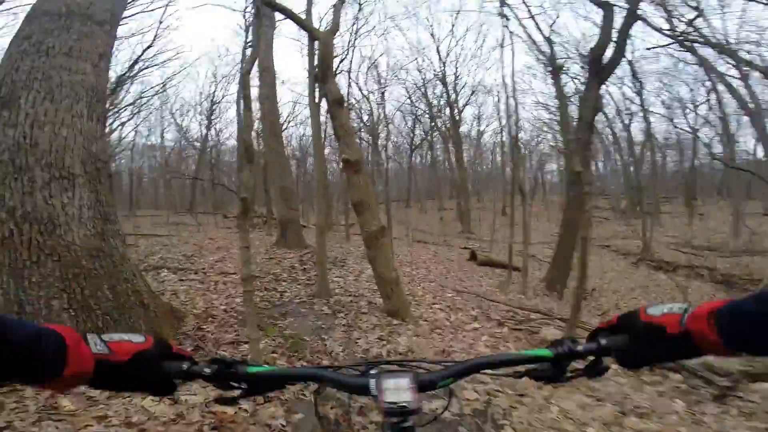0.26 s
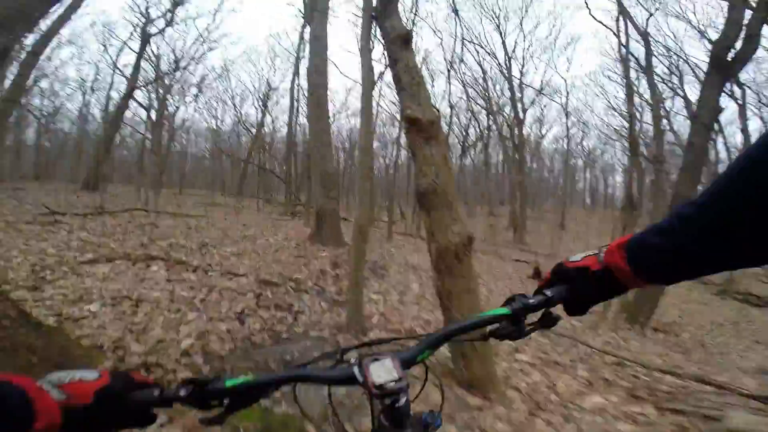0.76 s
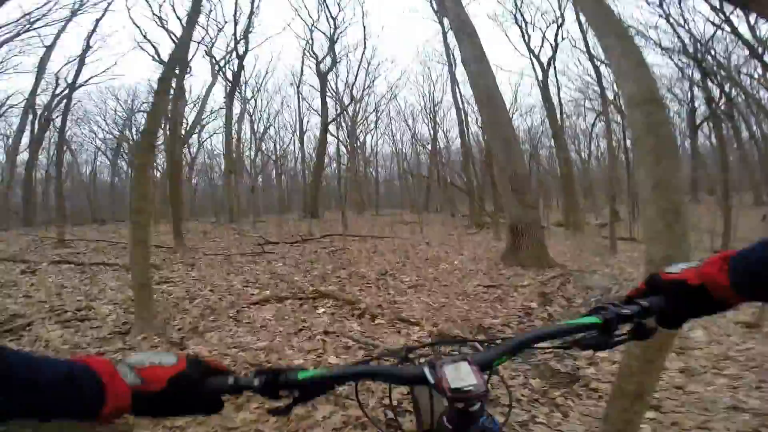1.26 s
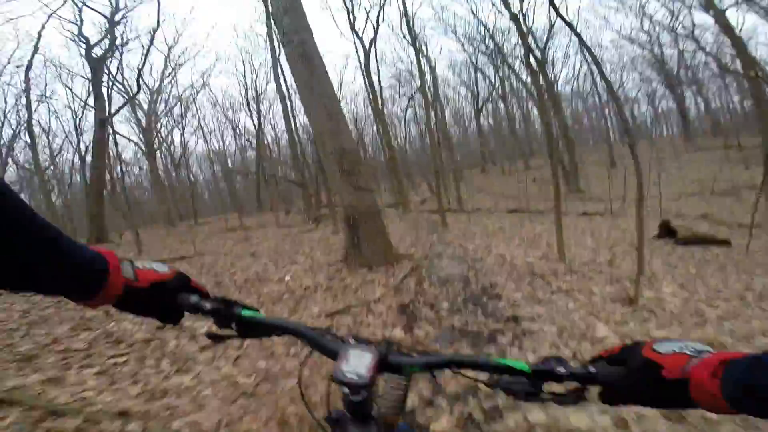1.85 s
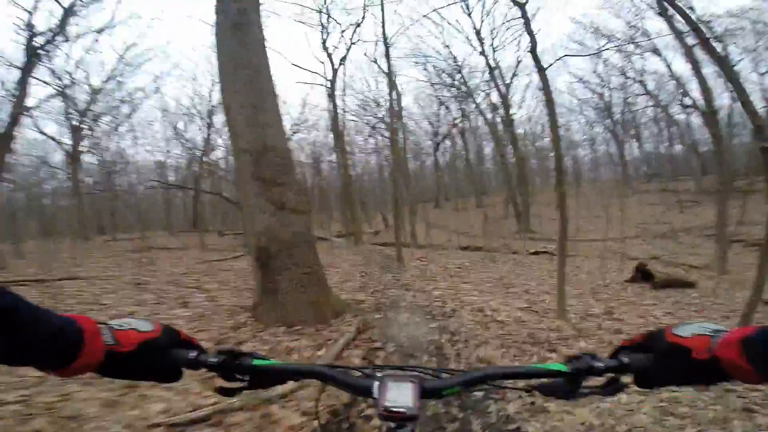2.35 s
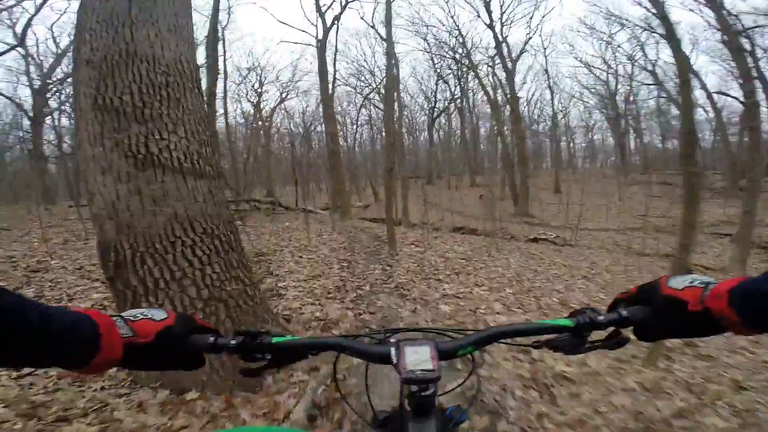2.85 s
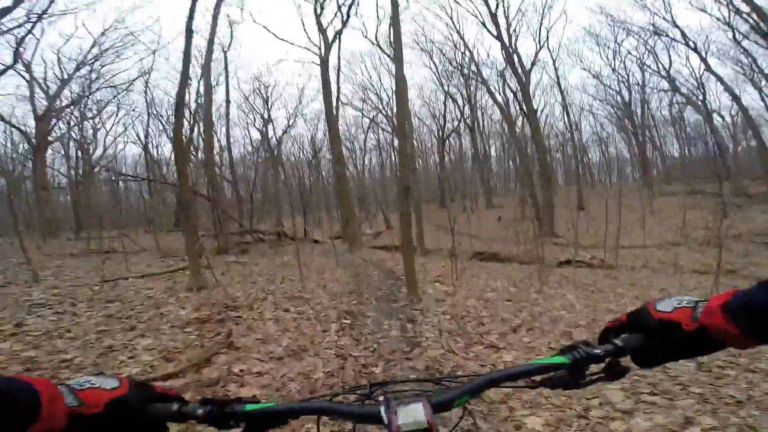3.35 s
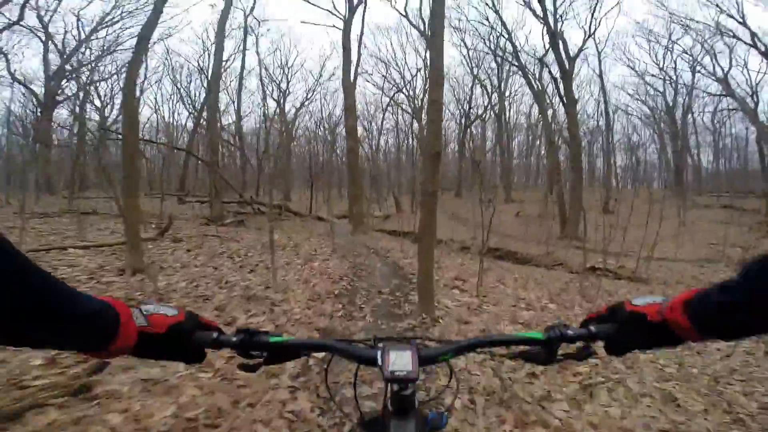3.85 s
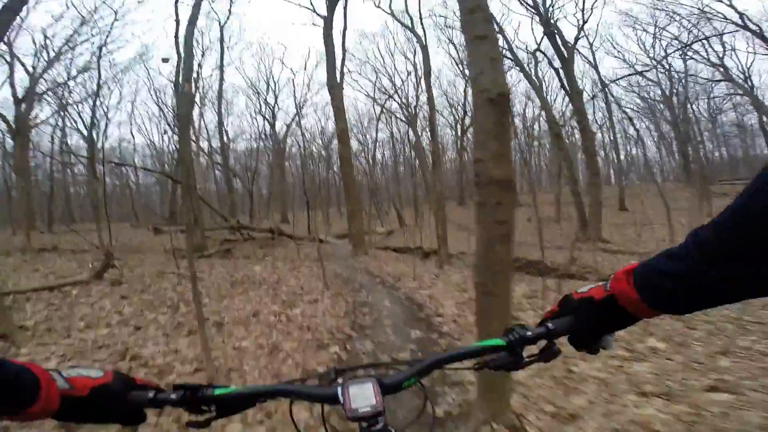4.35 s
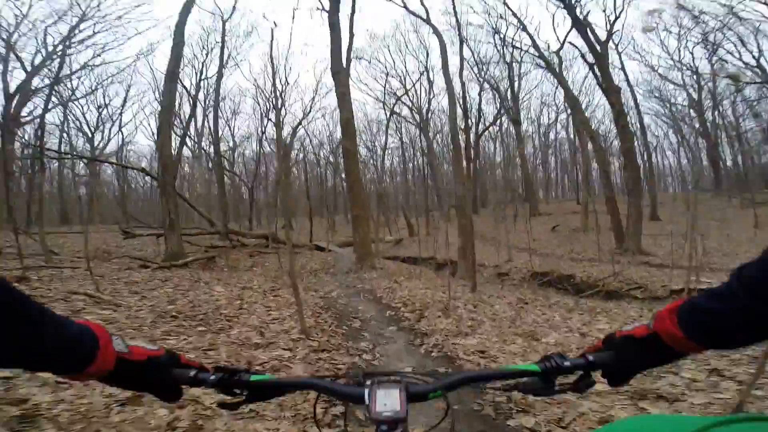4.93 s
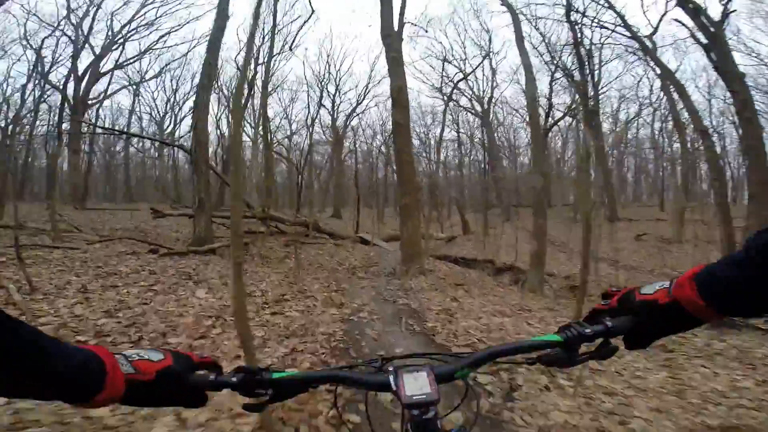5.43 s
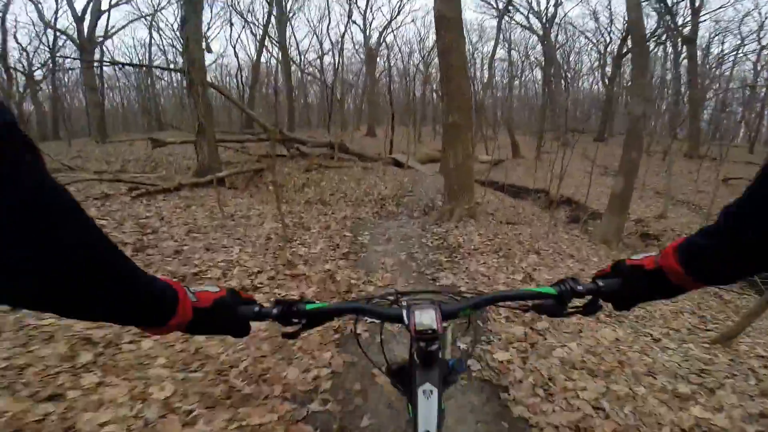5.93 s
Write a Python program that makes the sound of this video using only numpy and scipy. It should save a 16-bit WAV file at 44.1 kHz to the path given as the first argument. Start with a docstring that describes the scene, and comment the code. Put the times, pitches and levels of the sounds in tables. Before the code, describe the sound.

Bicycle tyres roll over dirt and dry leaves outdoors, very close and boxy, without noticeable echo. Low bumps and swaying rumble shake the mount, and hollow plastic ticks cluster early and mid-ride. The leaf crunch peaks in the middle, then calms to sparse crackles, faint hiss, soft thuds, one hard click near five seconds and a few small cloth brushes.

```python
"""A soft thump opens the scene over a low lumpy rumble and crackling leaves: a rider pedals a mountain bike
along a leafy woodland trail, heard by a microphone in a plastic housing. Thumps are short swings of pressure;
rumble, hiss and cloth swishes are shaped noise. Leaf snaps are noise bursts that ring the housing, while tyre
roll rings the mount and frame. Ticks and woody knocks are single blows on these same two bodies."""
import sys
import numpy as np
from scipy import signal
from scipy.fft import rfft, irfft
from scipy.io import wavfile
from scipy.ndimage import uniform_filter1d

SR = 44100
rng = np.random.default_rng(int(sys.argv[2]) if len(sys.argv) > 2 else 0)


def unload_wav(signal):
    """Save mono or channel-first audio to the path in sys.argv[1] as 16-bit WAV at rate SR, clipped to [-1, 1]."""
    wavfile.write(
        sys.argv[1],
        SR,
        np.round(np.clip(np.atleast_2d(signal).T, -1, 1) * 32767).astype(np.int16),
    )


N = 273420  # length in samples

# jolts through the mount, most of them one per pedal stroke; the crest comes 21.75 ms after start_s:
# start_s, level_db (main swing), pitch_hz, length_cycles
THUMPS = [(-0.019, -18.5, 39, 2), (0.319, -22.5, 36.2, 2.1), (0.496, -41, 31.8, 3), (0.626, -24, 35.4, 1.5),
          (0.79, -35, 32, 1.9), (0.973, -24.5, 33.7, 0.86), (1.305, -23.5, 50, 1.6),
          (1.347, -24.5, 55.4, 1.1), (1.435, -25, 60, 1.1), (1.51, -29, 32.3, 2), (1.615, -26.5, 60.5, 2.8),
          (1.955, -19, 63.6, 1.8), (2.287, -22, 46.4, 1.7), (2.406, -25, 32.5, 1.7),
          (2.613, -26.5, 78.1, 1.8), (2.941, -24.5, 59, 2.45), (3.247, -25.5, 54.7, 1.4),
          (3.272, -23, 48, 2.4), (3.352, -26.5, 35.8, 0.99), (3.596, -22, 47.8, 1.77),
          (3.918, -21.5, 46, 1.54), (4.263, -24, 60.7, 1.6), (4.408, -22.5, 50, 0.6),
          (4.596, -18.5, 37, 1.27), (4.647, -26, 112, 1.25), (4.927, -29.5, 34.7, 0.38),
          (4.967, -31, 53.3, 1.2), (5.24, -28, 78.1, 3), (5.414, -26, 74.5, 2.5), (5.51, -31.5, 92, 1.5),
          (5.578, -31, 77.5, 2.3), (5.899, -22, 45.4, 1.8)]
# shaking of the mount: time_s, sway_db (deep), rumble_db (quicker)
SHAKING_LEVELS = [(0.0, -33.5, -55), (0.14, -40.5, -46.5), (0.6, -37, -47), (1.2, -38, -43),
                  (1.6, -37.5, -45), (2.0, -35.5, -41.5), (2.45, -33.5, -50), (2.65, -34, -42.5),
                  (2.83, -39.5, -51.5), (3.0, -40.5, -48), (3.5, -38, -45), (4.0, -38.5, -46.5),
                  (4.45, -37, -46.5), (4.72, -48, -48.5), (5.0, -41.5, -45.5), (5.38, -37.5, -49),
                  (5.62, -36, -38), (5.84, -40, -49.5), (5.94, -40, -37.5), (6.03, -40, -57),
                  (6.2, -50, -52)]
# the rider's body heaves and the sway swells: peak_s, sway_db
BODY_HEAVES = [(0.28, -42), (0.65, -25), (0.85, -24.5), (1.09, -27), (1.17, -26), (1.26, -26), (1.5, -23),
               (1.67, -36), (1.95, -27.5), (2.19, -31), (2.35, -41), (2.47, -21.5), (3.64, -31), (4.3, -33),
               (4.51, -26.5), (4.61, -31.5), (4.94, -31), (5.29, -30.5), (5.42, -46), (5.77, -28),
               (6.13, -33.5)]
HEAVE_DB_PER_S = 266  # how fast a heave swells and fades
# tone colour of the deep sway: pitch_hz, level_db (relative, per Hz)
SWAY_COLOUR = [(4, 11.5), (14, 9), (26, 10.5), (45, -6.5), (80, -11.5)]
# tone colour of the quicker rumble: pitch_hz, level_db (relative, per Hz)
RUMBLE_COLOUR = [(25, -6), (50, -3), (100, -7), (170, -15), (280, -32.5), (600, -40.5)]

# steady bed of leaves under the tyres: time_s, crackle_db, roll_db (dull tyre roll)
LEAF_BED = [(0.0, -51.5, -53), (0.1, -62.5, -67), (0.4, -54.5, -55.5), (0.9, -52.5, -52), (1.1, -51, -52),
            (1.7, -53.5, -55.5), (1.92, -54.5, -56), (1.97, -44, -47.5), (2.25, -42.5, -45),
            (2.285, -54, -54), (2.33, -40.5, -46.5), (2.6, -39, -48.5), (2.86, -37, -40.5),
            (2.9, -43.5, -47), (3.0, -52.5, -52), (3.1, -42.5, -48.5), (3.43, -48.5, -54.5),
            (3.48, -54.5, -60.5), (3.72, -52.5, -57), (4.1, -58.5, -61.5), (4.36, -55, -55),
            (4.6, -62, -60.5), (5.14, -53, -56.5), (5.38, -66.5, -62), (5.65, -49.5, -52.5),
            (5.84, -61.5, -62.5), (6.2, -53.5, -55)]
# a tyre ploughs through a heap of leaves: loudest_s, crackle_db, length_s, roll_db (relative to crackle)
LEAF_CRUNCHES = [(0.192, -43.5, 0.073, -2), (0.337, -45, 0.19, -2), (0.515, -50, 0.068, -14),
                 (0.634, -40, 0.061, -2), (0.804, -46.5, 0.068, -10), (0.938, -46.5, 0.043, 6),
                 (1.022, -45, 0.26, 0), (1.159, -44.5, 0.065, 8), (1.272, -45.5, .09, -1),
                 (1.374, -49.5, 0.045, -1), (1.544, -41, 0.13, -4.5), (1.796, -39.5, 0.059, -3.5),
                 (1.972, -32.5, 0.036, -2), (2.037, -35.5, 0.042, -7), (2.112, -43.5, 0.061, -7),
                 (2.2, -35.5, 0.12, -8), (2.236, -33, 0.041, -6), (2.374, -31.5, 0.086, -8),
                 (2.435, -34, 0.054, -9), (2.507, -36, 0.046, -6), (2.552, -42, 0.02, -15),
                 (2.589, -34.5, 0.062, -23), (2.73, -57, .07, 6), (2.806, -39, 0.08, -10),
                 (2.848, -39, .05, -15), (3.046, -34.5, 0.047, -6), (3.12, -40.5, 0.064, -16),
                 (3.176, -43, .06, -10), (3.27, -58, 0.05, -11), (3.805, -44, 0.14, -1),
                 (4.04, -49.5, 0.16, -4.5), (4.207, -50, .07, -16), (4.355, -51.5, 0.14, -8),
                 (4.484, -56.5, 0.053, -3), (4.966, -43, .016, -22), (4.994, -52.5, .08, -17),
                 (5.132, -48, .06, -14), (5.441, -51, 0.11, -1)]
CRUNCH_RISE, CRUNCH_DROP_DB = 0.65, 15  # share of the length spent rising; drop at both ends
# leaf brightness as the trail surface changes: time_s, tilt_db_per_octave (at a crackle of -53.5 dB)
LEAF_BRIGHTNESS = [(0, 0.5), (.6, 1), (1.2, 0.5), (1.7, 4.5), (2.1, 2.5), (2.5, 3.5), (2.9, 2.5),
                   (3.25, 3.5), (3.6, 2), (4.2, 1.5), (5.1, 3.5), (5.45, 1), (6.2, 1.5)]
DULLING_DB = 0.25  # brightness per octave lost for each dB louder

# ways the housing rings: pitch_hz, width_hz (before extra damping), level_db (relative)
HOUSING_MODES = [(1310, 86, -10), (1720, 460, 6.5), (2350, 292, 3.5), (2674, 280, 5), (3499, 300, 3),
                 (4390, 610, -6.5), (5094, 283, -4.5), (6056, 970, -5), (7150, 1700, -15.5),
                 (8250, 1540, -16.5), (9780, 1200, -23.5), (11600, 1100, -29), (13040, 790, -29),
                 (14900, 780, -39)]
# low ways the mount and frame ring: pitch_hz, width_hz (before extra damping), level_db (relative)
FRAME_MODES = [(184, 164, 0), (310, 90, 1.5), (463, 117, -4), (613.5, 103, 0.5), (774, 320, -8),
               (1058, 58, -15.5), (988, 276, -10)]

# tone colour of the faint hiss: pitch_hz, level_db (relative, per Hz)
HISS_COLOUR = [(200, -25), (320, 3.5), (620, -5), (1050, -9), (1770, 2.5), (2100, -2.5), (2570, 4),
               (3060, -0.5), (3500, -4), (4700, -6), (6240, -13), (7600, -24.5), (10000, -20.5),
               (13000, -27), (14000, -26), (15300, -40)]
HISS_DB = -58  # middle level, before its small wavering

# ticks on the housing: start_s, peak_db, pitch_hz (strongest ring), treble_db (relative to peak)
HOUSING_TICKS = [(0.1044, -37.5, 3500, -19), (0.3337, -22, 1700, -49), (0.381, -41, 1820, -22),
                 (0.51, -36.5, 1790, -30), (0.536, -35, 2750, -23), (0.583, -31.5, 1710, -17),
                 (0.6263, -29, 1600, -19), (0.651, -29, 1670, -25), (0.7338, -31, 1710, -18),
                 (0.8039, -30, 2470, -22), (0.873, -35, 2630, -28), (0.921, -35, 1440, -30),
                 (0.972, -43, 1810, -7), (0.99, -31.5, 2560, -19), (1.049, -27.5, 1720, -18),
                 (1.151, -25.5, 2650, -21), (1.174, -35, 2090, -30), (1.1867, -30, 1650, -46),
                 (1.244, -37, 1790, -17), (1.7952, -31.5, 1720, -7), (1.8705, -35, 1760, -25),
                 (1.955, -27, 1960, -8), (2.025, -36, 2200, -17), (2.0867, -24.5, 2080, -28),
                 (2.1788, -28, 1720, -13), (2.2358, -20.5, 1630, -30), (2.2997, -33.5, 3480, -27),
                 (2.3275, -23.5, 1670, -25), (2.3375, -23.5, 1740, -23), (2.378, -26.5, 1900, -3),
                 (2.407, -27, 1700, -28), (2.4793, -21, 2260, -22), (2.547, -27, 2300, -16),
                 (2.5765, -23, 1780, -20), (2.6267, -24, 2420, -22), (2.634, -32, 2420, -6),
                 (2.659, -27, 2310, -25), (2.745, -25, 2250, -15), (2.805, -27, 1610, -17),
                 (2.815, -26.5, 2600, 2), (3.029, -33, 1630, 0), (3.0867, -30, 1840, -14),
                 (3.115, -32, 1800, -10), (3.177, -37, 2500, 0), (3.1971, -30, 3460, -23),
                 (3.3368, -29.5, 2560, -8.5), (3.3735, -29.5, 3480, -22), (3.406, -31, 2740, -14),
                 (3.914, -36.5, 2350, -34), (3.9686, -38.5, 1710, -3), (4.196, -29.5, 2290, -29),
                 (4.8889, -19, 2650, -16.5), (4.9595, -28, 2850, -9), (5.227, -34.5, 2560, -16),
                 (5.286, -37.5, 2420, -8), (5.2999, -36.5, 2660, -10), (5.5105, -31.5, 2580, -47),
                 (5.793, -29.5, 2200, -47), (5.8632, -30, 2350, -31), (5.965, -34, 2780, -20)]
NARROW_DB, NARROWING = -3, 0.75  # narrowness per octave, and its growth for each dB of treble lost
TAIL, TAIL_S = 0.13, 0.003  # rough tail of a tick: share of the blow, decay time in seconds

# woody knocks in mount and frame: start_s, peak_db, pitch_hz (strongest ring)
FRAME_KNOCKS = [(0.149, -39, 318), (0.33, -40, 207), (0.533, -39, 253), (0.616, -36.5, 587),
                (0.8025, -22, 430), (0.81, -32, 310), (0.904, -41, 891), (0.9205, -28.5, 850),
                (1.0478, -34, 680), (1.135, -40, 500), (1.149, -32, 700), (1.173, -36, 600),
                (1.186, -38, 500), (1.246, -32, 800), (1.275, -47, 283), (1.504, -33, 202),
                (1.524, -29.5, 196), (1.795, -34, 450), (1.83, -45, 305), (1.953, -31, 234),
                (2.028, -39, 283), (2.087, -39, 272), (2.126, -30, 398), (2.407, -34, 603),
                (2.459, -37, 331), (2.857, -35, 455), (3.032, -36, 670), (3.337, -33, 452),
                (3.371, -38, 226), (3.42, -32, 533), (3.739, -42, 409), (4.194, -37.5, 352),
                (4.425, -37, 202), (4.664, -37.5, 202), (4.886, -36, 403), (5.435, -48, 202)]
KNOCK_NARROW_DB = 8.5  # loss per octave away from the strongest ring

# smooth swishes, likely cloth brushing the housing: start_s, length_s, level_db
CLOTH_SWISHES = [(3.757, 0.071, -43.5), (4.439, 0.057, -48.5), (5.54, 0.18, -47)]
# tone colour of the swishes: pitch_hz, level_db (relative, per Hz)
SWISH_COLOUR = [(530, -53), (900, -65), (1410, -6), (1660, -15.5), (2550, 0), (3360, -4.5), (4260, -3.5),
                (4780, -13.5), (5220, -3.5), (7430, -39), (9660, -56), (16300, -120)]

EDGE_HZ = 15250  # top of the recorder's band


def gain_of(db):
    """Turns decibels into a gain."""
    return 10 ** (np.asarray(db) / 20)


def evened(x):
    """Scales a sound to an average strength (rms) of 1."""
    return x / np.sqrt(np.mean(x ** 2) + 1e-20)


def add(mix, s, sound):
    """Mixes a sound in at time s; what falls before the start is lost."""
    at = round(s * SR)
    sound = sound[max(-at, 0):]
    part = mix[max(at, 0):][:len(sound)]
    part += sound[:len(part)]


def curves(rows):
    """Draws straight lines through each table column, giving one value per sample."""
    s, *columns = np.transpose(rows)
    t = np.arange(N) / SR
    return [np.interp(t, s, column) for column in columns]


def noise(points):
    """Colours random noise with a table of levels over pitch, at rms 1."""
    hz = np.fft.rfftfreq(N, 1 / SR)
    f, db = np.transpose(points)
    colour_db = np.interp(np.log(hz + 1), np.log(f + 1), db, left=-90, right=-90)
    return evened(irfft(rfft(rng.standard_normal(N)) * gain_of(colour_db), N))


def lumps(seconds):
    """Smooths chance over the given time into a slow wavering, rms 1."""
    size = max(round(seconds * SR), 1)
    smoother = uniform_filter1d(rng.standard_normal(N), size)
    return evened(uniform_filter1d(smoother, size))


def swells(bed_db, s, db, rise_db_per_s, fall_db_per_s):
    """Puts swells that peak at times s on top of a level in dB; powers add."""
    grid = np.arange(0, N, 64)  # every 64 samples is fine enough
    late = grid[:, None] / SR - s
    peaks_db = db - np.where(late < 0, -late * rise_db_per_s, late * fall_db_per_s)
    power = np.interp(np.arange(N), grid, np.sum(gain_of(peaks_db) ** 2, axis=1))
    return 10 * np.log10(gain_of(bed_db) ** 2 + power)


def ring(modes, extra_db=0, damping=1):
    """Each mode answers a click by swelling, then dying; neighbours swing opposite ways."""
    hz, width, db = np.transpose(modes)[:, :, None]
    t = np.arange(1536) / SR
    sign = (-1.) ** np.arange(len(hz))[:, None]
    fall = 1.55 * damping * np.pi * width
    envelope = fall ** 2 * t * np.exp(-fall * t)
    return sign * gain_of(db + extra_db) * envelope * np.sin(2 * np.pi * hz * t)


def rubbed(modes, loudness, own_db, tilt_db=0, pivot_hz=2500):
    """Rough bursts ring a body; each mode's share wavers by chance, so no snap reaches all alike."""
    rough, out = loudness * rng.standard_normal(N), np.zeros(N)
    answers = ring(modes)
    for (hz, _, _), answer in zip(modes, answers):
        reach_db = own_db * lumps(0.016) + tilt_db * np.log2(hz / pivot_hz)
        out += signal.oaconvolve(rough * gain_of(reach_db), answer)[:N]
    return out / np.sqrt(np.mean(rough ** 2) * np.sum(answers.sum(0) ** 2))


def struck(modes, blow, extra_db, damping):
    """One blow rings all modes of a body together, scaled to peak 1."""
    sound = np.convolve(blow, ring(modes, extra_db, damping).sum(0))
    return sound / abs(sound).max()


def thumps():
    """A jolt presses the microphone port: a swing or two with a sharper crest in the middle."""
    out = np.zeros(N)
    for s, db, hz, cycles in THUMPS:
        turns = np.arange(-1.5, 2.5, hz / SR / cycles) * cycles  # 0 at the crest
        slower_fall = np.where(turns > 0, 2.1, 1)
        swing = np.cos(2 * np.pi * turns) * np.exp(-(3.27 * turns / cycles) ** 2 / slower_fall)
        crest = np.cos(2 * np.pi * 2.46 * turns) * np.exp(-(1.7 * turns) ** 2)
        add(out, s + 0.02175 + turns[0] / hz, gain_of(db) * (swing + 0.16 * crest))
    return out


def shaking():
    """The mount sways and rumbles in lumps as the wheels meet small bumps."""
    sway_db, rumble_db = curves(SHAKING_LEVELS)
    sway_db = swells(sway_db, *np.transpose(BODY_HEAVES), HEAVE_DB_PER_S, HEAVE_DB_PER_S)
    sway = gain_of(sway_db) * noise(SWAY_COLOUR)
    rumble = gain_of(rumble_db + 5.38 * lumps(0.026)) * noise(RUMBLE_COLOUR)
    return sway + rumble


def crackle(per_s, spread_db, clump_db, snap_s, hush):
    """Loudness of clumped snaps of very unequal size, each dying fast, over a finer hush."""
    chance = per_s / SR * gain_of(clump_db * lumps(0.023))
    size = gain_of(spread_db * np.minimum(rng.exponential(1, N), 3.5))
    hits = size * (rng.random(N) < chance)
    decay = np.exp(-1 / (snap_s * SR))
    return evened(signal.lfilter([1], [1, -decay], hits)) + hush


def leaves():
    """Snapping leaves ring the housing; the tread rolling on dirt rings the frame."""
    bed_db, bed_roll_db = curves(LEAF_BED)
    s, db, length, roll_rel_db = np.transpose(LEAF_CRUNCHES)
    rise = CRUNCH_DROP_DB / (CRUNCH_RISE * length)
    fall = CRUNCH_DROP_DB / ((1 - CRUNCH_RISE) * length)
    level_db = swells(bed_db, s, db, rise, fall)
    roll_db = swells(bed_roll_db, s, db + roll_rel_db, rise, fall)

    tilt_db = curves(LEAF_BRIGHTNESS)[0] - DULLING_DB * (level_db + 53.5)
    harder_db = 0.13 * (roll_db + 48.5)  # a harder roll favours the higher frame modes
    snaps = crackle(per_s=420, spread_db=3.5, clump_db=2.5, snap_s=0.0034, hush=1.0)
    grit = 0.22 * snaps + crackle(per_s=190, spread_db=2.0, clump_db=2.5, snap_s=0.0081, hush=0.43)
    crackling = gain_of(level_db) * rubbed(HOUSING_MODES, snaps, 1.5, tilt_db)
    rolling = gain_of(roll_db) * rubbed(FRAME_MODES, grit, 1.36, harder_db, pivot_hz=620)
    return crackling + rolling


def hiss():
    """Faint rustle and microphone noise: coloured noise with a slightly wavering level."""
    return gain_of(HISS_DB + 1.5 * lumps(0.01)) * noise(HISS_COLOUR)


def ticks():
    """A sharp blow with a faint rough tail rings the housing most near the tick's own pitch."""
    out, t = np.zeros(N), np.arange(400) / SR
    modes_hz = np.array(HOUSING_MODES)[:, :1]
    roughs = rng.standard_normal((len(HOUSING_TICKS), 400))
    for (s, db, hz, treble_db), rough in zip(HOUSING_TICKS, roughs):
        narrow_db = NARROW_DB - NARROWING * treble_db  # dull ticks favour their pitch most
        near_db = -abs(narrow_db * np.log2(modes_hz / hz))
        # modes from 4 kHz up follow the treble column, lifted over their low standing in the table
        extra_db = np.where(modes_hz < 4000, near_db, treble_db + 11.5)
        blow = (t == 0) + TAIL * rough * np.exp(-t / TAIL_S)
        # damping below 1: a clean blow shows sharper modes than rubbing does
        add(out, s, gain_of(db) * struck(HOUSING_MODES, blow, extra_db, damping=0.81))
    return out


def knocks():
    """Each knock is one blow that favours the frame modes near its own pitch."""
    out, modes_hz = np.zeros(N), np.array(FRAME_MODES)[:, :1]
    for s, db, hz in FRAME_KNOCKS:
        near_db = -abs(KNOCK_NARROW_DB * np.log2(modes_hz / hz))
        add(out, s, gain_of(db) * struck(FRAME_MODES, [1], near_db, damping=1.18))
    return out


def swishes():
    """Brushing cloth makes fine even noise that swells and fades."""
    t, swell = np.arange(N) / SR, np.zeros(N)
    for s, length, db in CLOTH_SWISHES:
        arch = abs(np.sin(np.pi * np.clip((t - s) / length, 0, 1)))
        swell += gain_of(db) * arch ** 0.43
    return swell * noise(SWISH_COLOUR)


def scene():
    """All sources reach one microphone."""
    return (thumps() + shaking() + leaves() + hiss() + ticks() + knocks() + swishes())[None]


def record(dry):
    """The recorder's band limit cuts off the highest treble."""
    low_pass = signal.firwin(511, EDGE_HZ, window=("kaiser", 9), fs=SR)
    return signal.oaconvolve(dry, low_pass[None], "same")


dry = scene()
out = record(dry)
unload_wav(out)
```